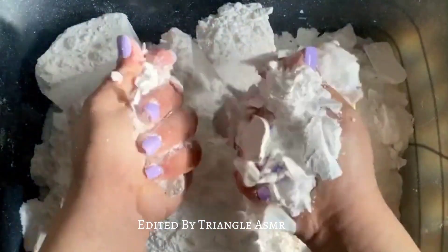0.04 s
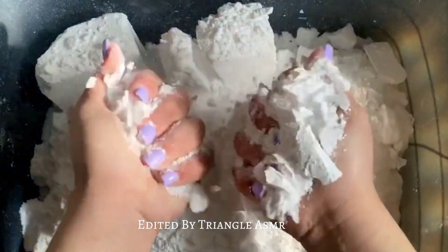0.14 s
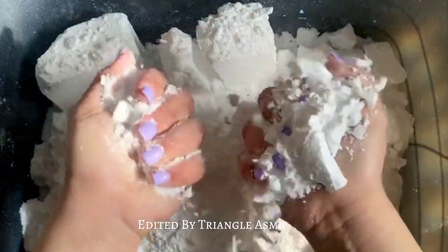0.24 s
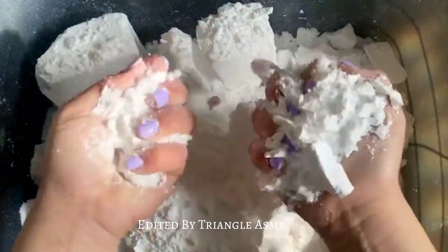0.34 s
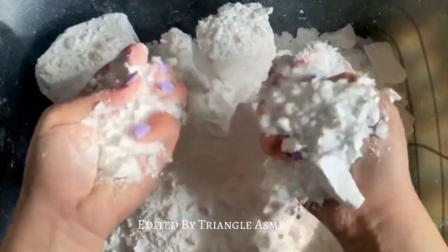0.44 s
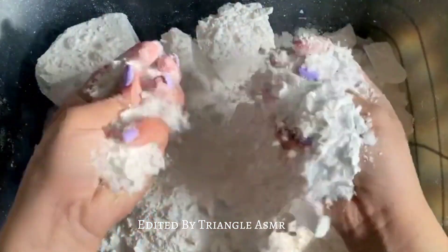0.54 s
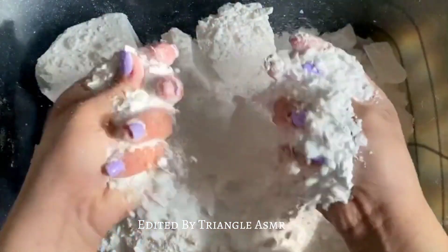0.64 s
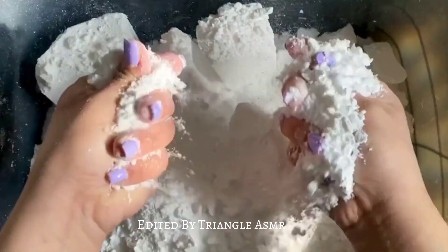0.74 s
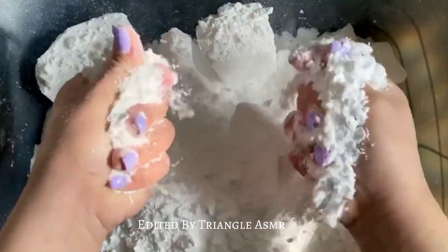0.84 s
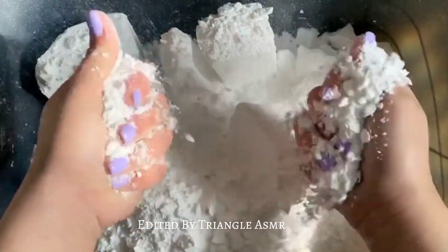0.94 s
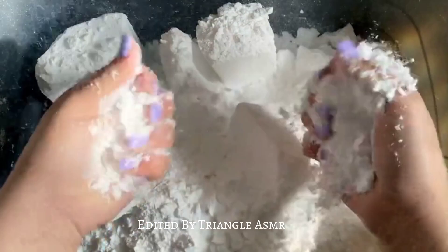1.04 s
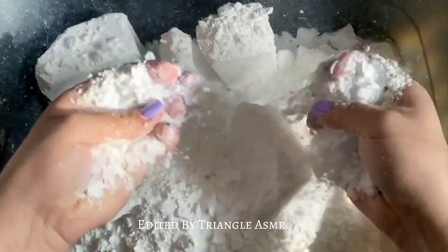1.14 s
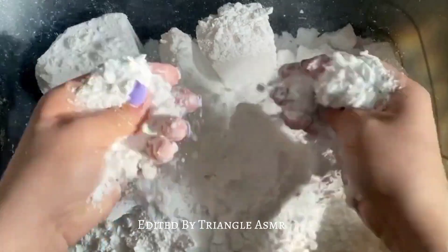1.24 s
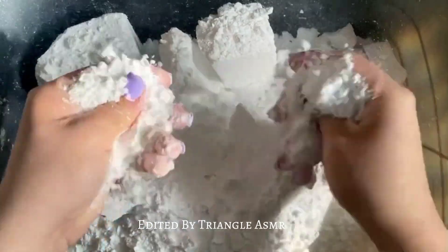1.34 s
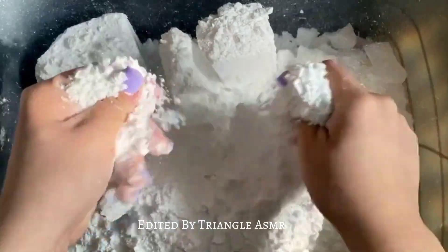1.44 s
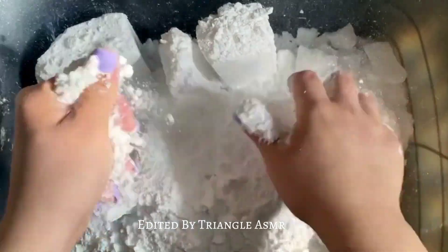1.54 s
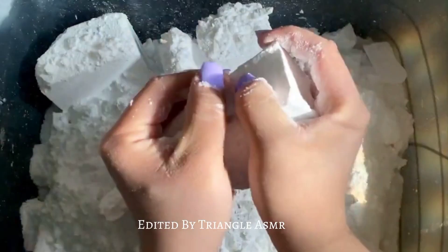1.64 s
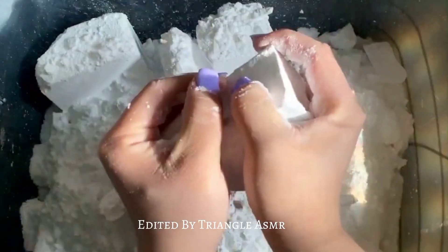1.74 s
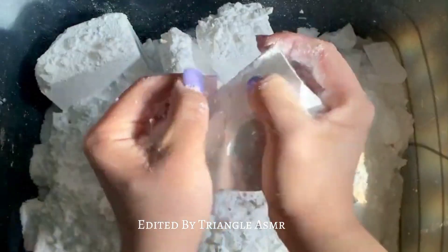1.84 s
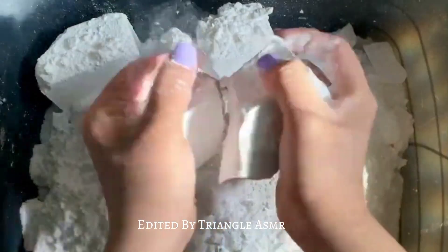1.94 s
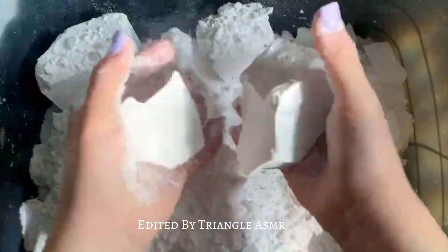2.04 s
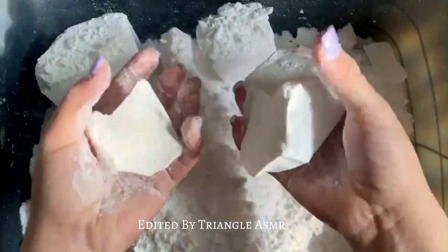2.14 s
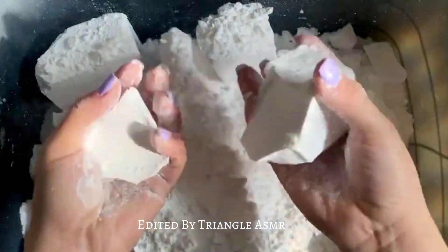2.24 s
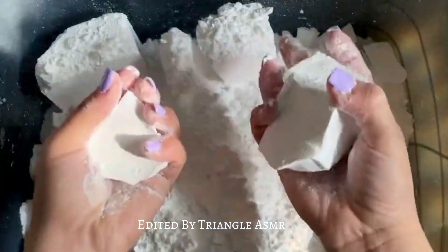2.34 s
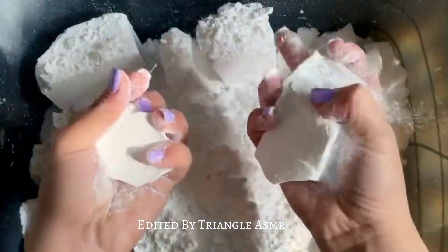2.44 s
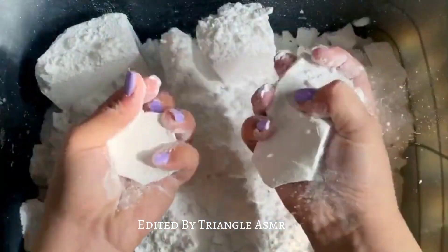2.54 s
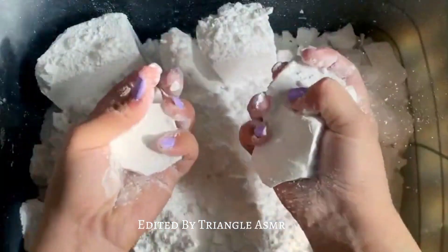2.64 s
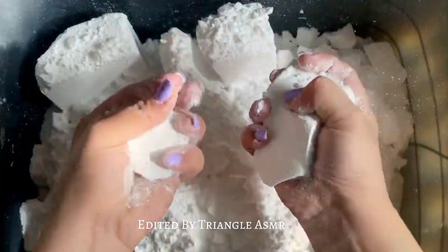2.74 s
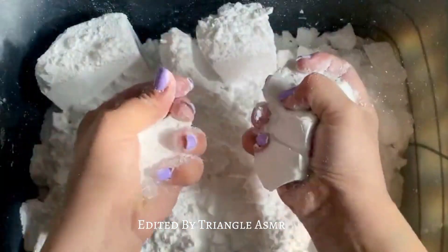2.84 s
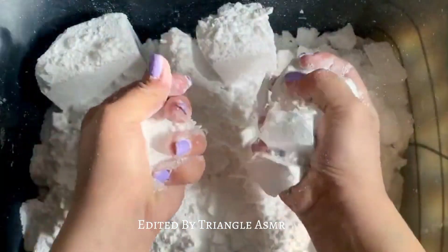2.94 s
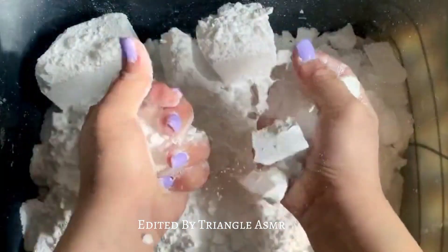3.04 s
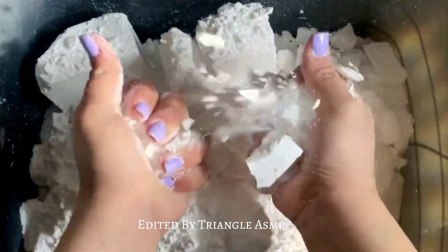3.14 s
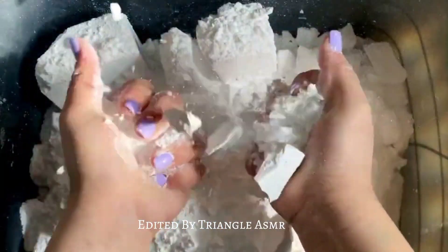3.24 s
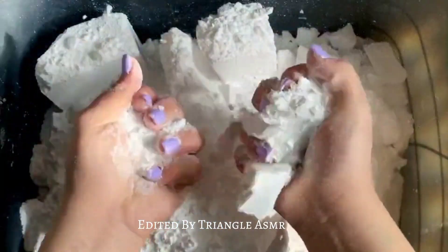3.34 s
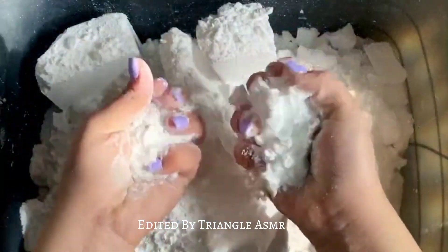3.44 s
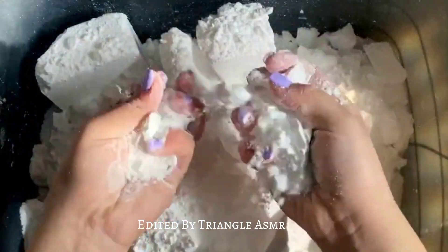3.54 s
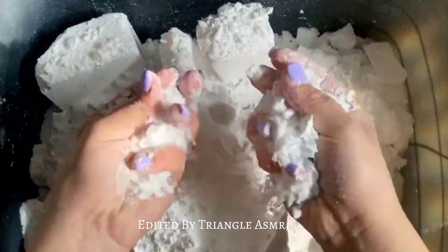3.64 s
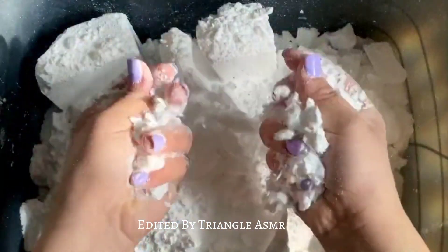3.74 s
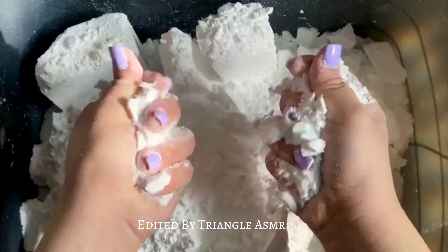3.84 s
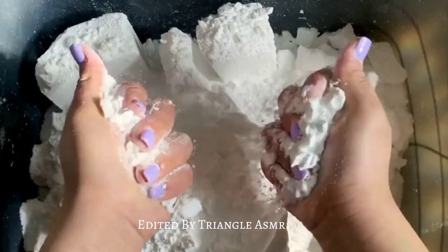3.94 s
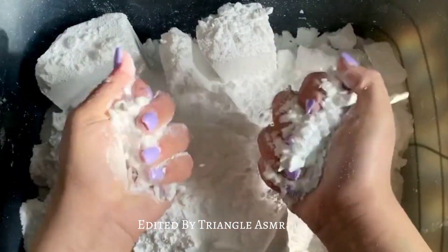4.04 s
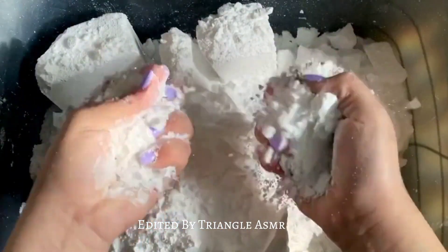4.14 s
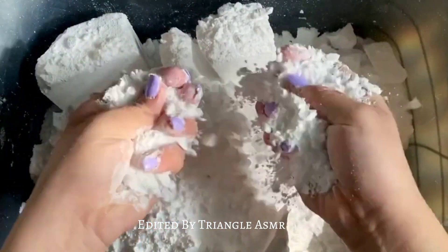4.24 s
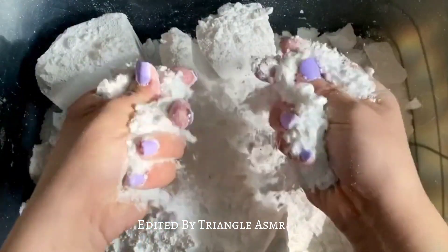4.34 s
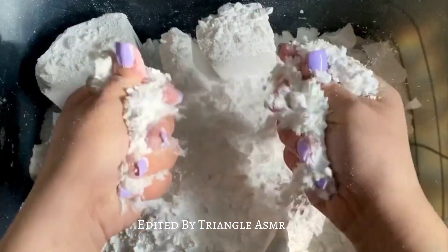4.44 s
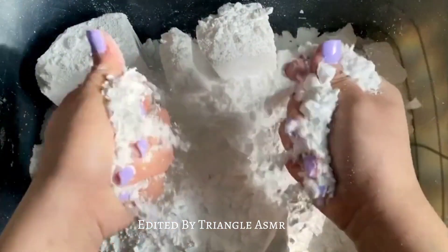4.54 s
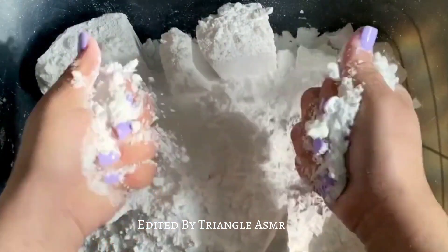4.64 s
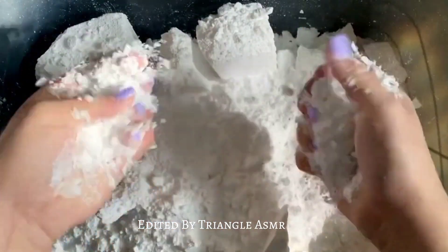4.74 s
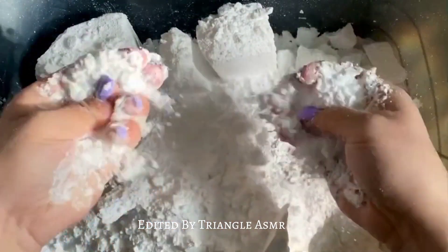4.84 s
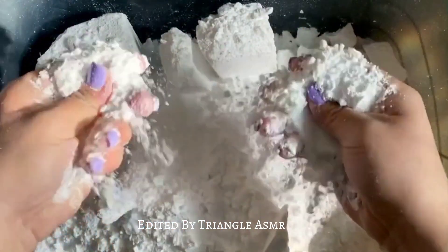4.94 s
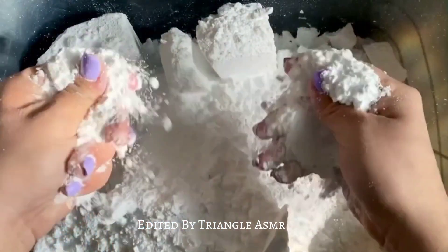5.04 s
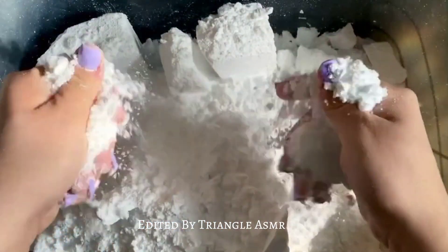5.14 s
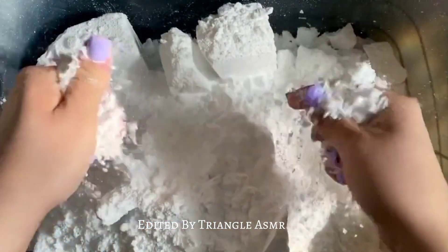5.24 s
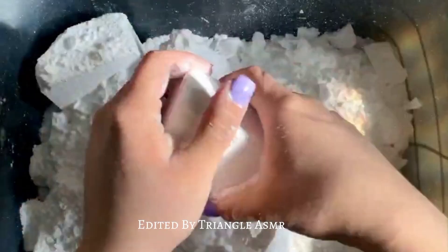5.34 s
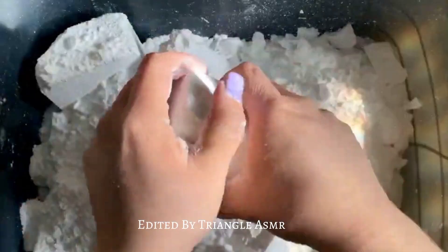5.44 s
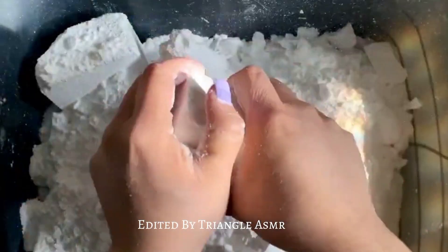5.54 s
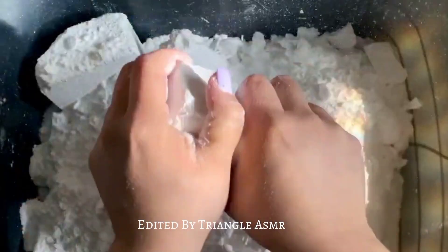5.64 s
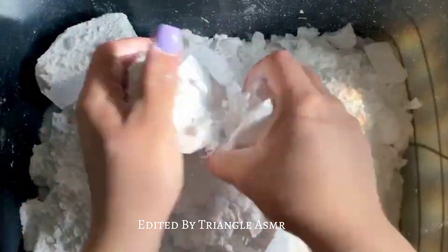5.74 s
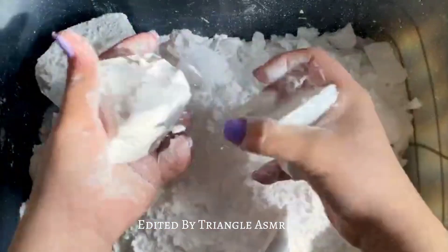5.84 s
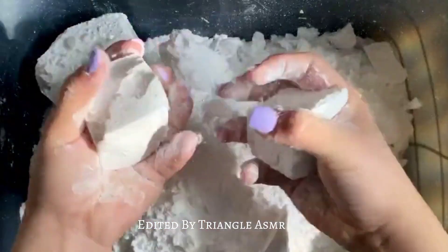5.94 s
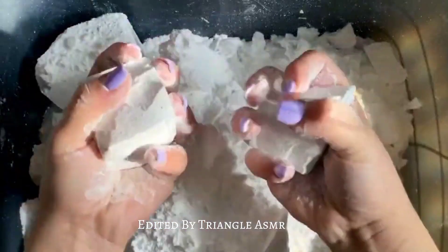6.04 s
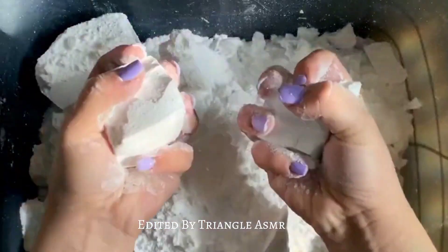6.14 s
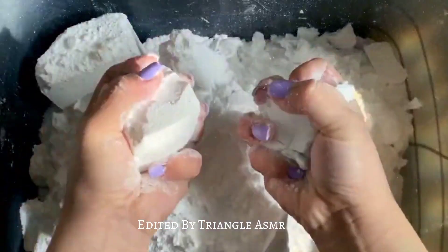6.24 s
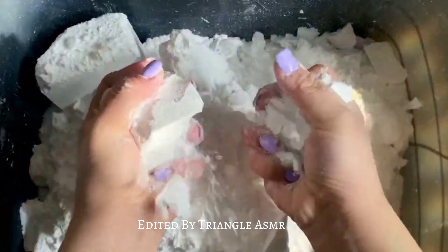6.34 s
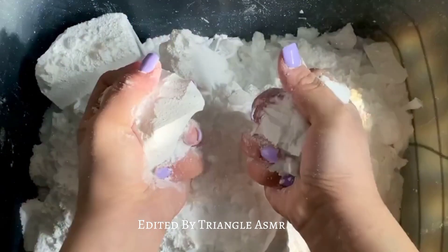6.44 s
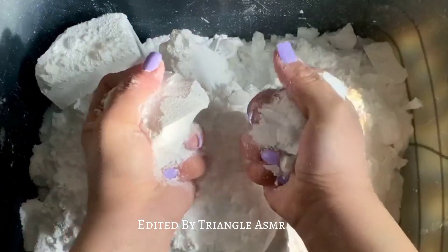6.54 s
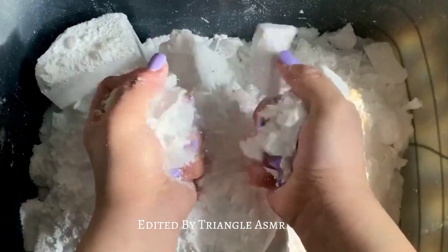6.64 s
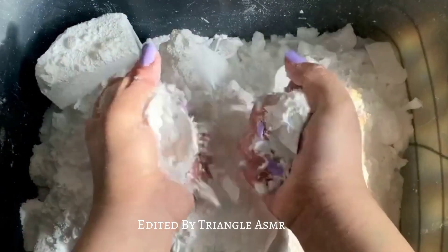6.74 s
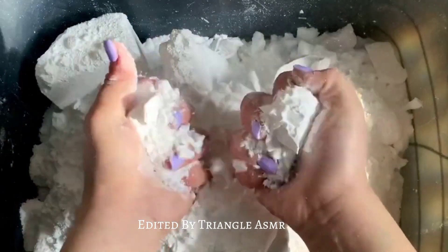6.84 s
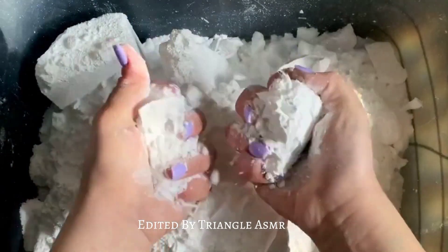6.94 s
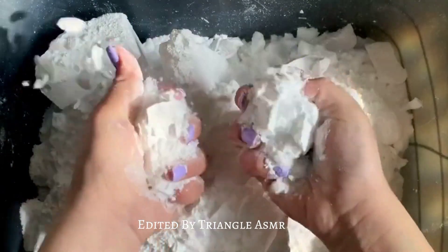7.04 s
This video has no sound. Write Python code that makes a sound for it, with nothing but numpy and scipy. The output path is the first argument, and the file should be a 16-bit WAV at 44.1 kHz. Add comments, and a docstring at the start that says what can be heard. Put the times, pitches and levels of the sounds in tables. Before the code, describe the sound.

Close, dry chalk crushing: soft crumbling and crumb thuds, then loud brittle snaps, crackling fractures and powdery crunches in a small room with low hum.

```python
"""Faint dry cracks and the soft thuds of crumbs come first, over a low hum; then sharp fractures ring in a room.
Two hands close to the microphone snap and crush chalk blocks over a bin of powder. Fractures are band-limited
noise bursts, splitting blocks and crumbs are decaying modes, crumbling is random ringing grains plus hiss, and
rubbing is noise in narrow resonances. A far machine is sines on rumble. The signal now and then drops in short
square pops, and at two edits the level dips briefly."""
import sys
import numpy as np
from scipy import signal
from scipy.io import wavfile

SR = 44100
rng = np.random.default_rng(int(sys.argv[2]) if len(sys.argv) > 2 else 0)


def boost(x):
    """Linear amplitude factor 10**(x/20) for a level x in decibels (scalar or array-like)."""
    u = np.asarray(x, float) / 20
    return 10 ** u


def generate_wav(signal):
    """Clip the signal to [-1, 1] and save it as 16-bit WAV at the path in sys.argv[1]."""
    frames = np.transpose(np.atleast_2d(signal))
    scaled = np.clip(frames, -1, 1) * 32767
    pcm = np.round(scaled).astype(np.int16)
    wavfile.write(sys.argv[1], SR, pcm)


N = 313110

# machine tones: multiple of HUM_HZ, level/dB rms
HUM_TONES = [(1, -48.5), (2, -65), (4, -63.5)]
HUM_HZ = 39.04
# machine rumble: f/Hz, level/dB rms in band
RUMBLE_BANDS = [(14, -46.5), (22, -60.5), (32, -55.5), (50, -64), (80, -64), (130, -64), (210, -64),
                (330, -77), (520, -73)]
# square drops of the signal: t/s, depth/dB
POPS = [(2.446, -20), (2.4848, -28), (2.4997, -25), (2.506, -26.5), (2.512, -10), (2.5185, -14.5),
        (2.5244, -16.5), (2.5921, -20), (2.6013, -19.5), (2.6151, -29), (2.6222, -23), (3.7162, -20.5),
        (3.7306, -21)]
POP_S = 0.000764
HELD_POP_S, HELD_POP_DB = 2.4688, -34  # one longer drop: start, depth
# edits where the level dips: t/s, fade half-width/s
EDIT_DIPS = [(1.588, 0.007), (5.336, 0.0052)]
# cupped hands and microphone: f/Hz, width/Hz, lift/dB
MIC_PEAKS = [(1056, 380, -2.5), (1520, 480, 2), (4280, 1860, -1.5), (14200, 890, 6)]
TREBLE_STOP_HZ = 15660  # from here up the treble cut takes off 40 dB
# room tail: f/Hz, t60/s, level/dB
ROOM_BANDS = [(305, 0.15, -3.5), (560, 0.42, -4), (1065, 0.6, -6.5), (2230, 0.38, -7.5), (4160, 0.33, -6.5)]
# rubbing strokes, and last a short noisy puff: start/s, end/s, level/dB
RUB_STROKES = [(1.811, 2.036, -62), (2.061, 2.26, -63.5), (5.653, 5.83, -61), (5.878, 5.908, -54)]
# whistles of the rubbing: f/Hz, width/Hz, level/dB against the stroke
RUB_WHISTLES = [(3020, 200, -23), (5860, 1300, -6), (7600, 280, -7.5), (9100, 2700, -1.5),
                (12200, 1000, -4), (13300, 990, -2), (15200, 600, -2)]
# spans with few small crumbs: start/s, end/s
SPARSE_SPANS = [(1.7, 2.32), (5.35, 5.94)]
# kneading of the hands: t/s, effort as level/dB of loose chalk, fineness/dB (powder up, crumbs down)
KNEADING = [(0.0, -41.5, 6), (0.15, -52, 1.5), (0.3, -50.5, 1.5), (0.5, -47.5, 3), (0.7, -50.5, 3),
            (0.96, -48.5, 4), (1.18, -53, 1), (1.575, -52, 1), (1.6, -62, 0.5), (1.84, -57.5, -3),
            (2.05, -59.5, 1), (2.22, -49, 13.5), (2.29, -58, 7), (2.5, -50.5, 4), (2.561, -59, 6),
            (2.64, -50, 7), (2.9, -51.5, 9), (3.2, -51.5, 0.5), (3.7, -45.5, 3), (3.8, -47, 4),
            (3.93, -52, -1), (4.5, -51.5, 3.5), (4.69, -54.5, -0.5), (4.9, -52.5, 0.5), (5.32, -52.5, 4),
            (5.35, -51.5, 9), (5.49, -55.5, 6), (5.75, -50, 5.5), (5.97, -56, 6), (6.12, -55.5, 7),
            (6.25, -49, 6), (6.42, -55.5, 4), (6.55, -41, -1.5), (6.75, -54, -3), (6.94, -55.5, 4.5),
            (7.02, -47.5, -2.5), (7.1, -52.5, 12)]
# crumbs, grit, powder: low f/Hz, high f/Hz, grains per s, size spread/dB, cycles to t60, hiss level/dB,
# layer level/dB, share of fineness, spill level/dB
GRAIN_LAYERS = [(245, 1210, 260, 5.5, 1.2, 5, -7.5, -0.86, -9),
                (1510, 6100, 500, 3, 3.3, 2.5, -7, -0.81, -10.5),
                (6900, 19800, 1600, 3.5, 4.2, 0.5, -6.5, 0.4, 1.5)]
# powder that runs out after a fracture: level against its edge, time to die by 60 dB
SPILL_DB, SPILL_T60_S = -18, 0.25
# crumbs landing in the bin: t/s, strike level/dB, f/Hz of the lowest mode
CRUMB_THUDS = [(0.05, -32.5, 676), (0.087, -31.5, 373), (0.13, -28.5, 380), (0.546, -38, 560),
               (0.599, -37.5, 392), (0.651, -38, 490), (2.48, -37, 340), (3.437, -39.5, 800),
               (4.483, -43, 457), (5.976, -43, 407), (6.623, -35.5, 530)]
THUD_CYCLES = 8.7  # cycles in which a thud mode dies by 60 dB
# hard chips that ring briefly: t/s, strike level/dB, f/Hz, t60/s
RINGING_CHIPS = [(5.603, -48, 4160, .04), (5.6435, -46, 4220, 0.02), (5.655, -42.5, 9650, 0.024),
                 (6.72, -39.5, 3280, 0.039), (6.986, -39, 3220, 0.017), (0.47, -40, 7860, 0.024),
                 (0.599, -39, 6340, 0.015)]
# solid pieces that ring as they split: t/s, strike level/dB, pitch as a multiple of BLOCK_MODES
BLOCK_SPLITS = [(1.3241, -34, 1.55), (1.3525, -35.5, 1.15), (1.6866, -9.5, .95), (2.8851, -29, 2.3),
                (2.9398, -18.5, 2.6), (3.0066, -35, 2.5), (4.4831, -32.5, 1.1), (4.668, -35, 2.1),
                (5.4992, -14, .86), (5.5121, -13, 3.3), (6.423, -44, 2.6), (6.4705, -8.5, 2.0),
                (6.5754, -23, 2.3), (7.054, -34, 3.2)]
# modes of a block at pitch 1: f/Hz, level/dB, t60/s
BLOCK_MODES = [(810, 1.5, 0.0073), (1870, -21.5, 0.029), (2500, -17.5, 0.0065), (502, -9.5, 0.0069)]
# fractures: t/s, knock level/dB, tilt/dB per octave (small pieces tilt up), bright edge level/dB against the knock
FRACTURES = [(0.0056, -47, -4, -7), (0.0409, -51, 10, -3), (0.0619, -38.5, -4.5, -17),
             (0.1137, -41.5, -0.5, 0), (0.218, -52.5, 7, 13), (0.2977, -47, -0.5, -15),
             (0.3206, -54, -2, 10), (0.4708, -51, -5, 13), (0.4794, -47, -6, -4), (0.5164, -49, -1, 13),
             (0.6794, -46, -1.5, -2), (0.7355, -51, 9, 11), (0.9342, -52.5, 7, 11),
             (0.9862, -44.5, 0.5, -15), (1.2063, -55, 11.5, 3), (1.2411, -53.5, 8, -5),
             (1.6862, -18.5, -1, -3.5), (2.232, -45, 3.5, 3.5), (2.3105, -49, -1, 8),
             (2.328, -49.5, 12, 21), (2.3387, -33, 6.5, 8.5), (2.641, -40, 0, 9.5), (2.6543, -48, 11.5, 9),
             (2.6703, -35, -3, 2.5), (2.699, -45, 10.5, 18.5), (2.708, -49, 5, 6), (2.726, -38, 2, 6),
             (2.757, -60, 6, 18), (2.7713, -54.5, 5, 22), (2.8175, -43, -6, 9), (2.8266, -42, 11.5, 1),
             (2.8327, -30, -1, 7), (2.8485, -53, 11, -1), (2.8833, -33, 2, -14), (2.895, -37, 0.5, 4),
             (2.915, -43, 5, -1), (2.921, -48, 8, 11), (2.9391, -35.5, 1.5, 0), (2.989, -58, 10, 9),
             (3.0066, -24, 1.5, -3), (3.02, -22, 1, 1), (3.0242, -36, 5, 6), (3.036, -50, 8, 7),
             (3.066, -55, 13, 14), (3.1166, -32, 3.5, -16), (3.1276, -43, 8, 11), (3.2077, -44, 7.5, 9),
             (3.26, -42, 3.5, -23), (3.2963, -52, 6, -1), (3.3178, -41, 5, -16), (3.3716, -43, 2, -18),
             (3.549, -40.5, 3.5, 1), (3.6666, -48, 7.5, 0), (3.6863, -53.5, 12, 12), (3.7892, -66, 6, 24),
             (3.8293, -40, 7.5, -12), (3.8378, -39, 4.5, 2), (3.9314, -54, 8, 11), (4.002, -38.5, 2, -16),
             (4.0778, -48, 5.5, -8), (4.1002, -60, 4.5, 23), (4.2045, -49.5, -3, 9), (4.3434, -48, 1, -1),
             (4.6063, -63, -4, 19), (4.668, -56, -5, -23), (4.7392, -45, -1, -12), (5.491, -65, 14, 1),
             (5.5, -24.5, 4, 7), (5.5045, -40.5, 6.5, 0), (5.5114, -30.5, 1.5, 7),
             (5.9443, -52.5, 10.5, 17.5), (5.9841, -54.5, 14.5, 12.5), (6.066, -51, 6.5, -3),
             (6.1464, -47.5, -4, 8), (6.181, -55, 12, 16), (6.2228, -36.5, 4.5, 8), (6.2343, -57, 7, 17),
             (6.283, -42, 5, 0), (6.318, -48.5, 5.5, -1), (6.422, -30.5, 3, -7), (6.4708, -27.5, 1, 5.5),
             (6.49, -28.5, 2, 2), (6.502, -34, -1, -8), (6.5544, -40, 2, 2), (6.5753, -28, -0.5, 5.5),
             (6.6133, -58, 1, 9), (6.6909, -50, 4.5, 13), (6.7211, -47, 2, 7), (6.8797, -37, 2, 0.5),
             (6.9264, -45.5, 4.5, 6), (6.986, -42, 1, 1.5), (7.0513, -42, 1, -28), (7.0556, -41, -1, -31)]
# fracture bands: low f/Hz, high f/Hz, splinter t60/s, splinter level/dB against the push, band level/dB
FRACTURE_BANDS = [(280, 1270, 0.0018, -14, -4), (1050, 3510, 0.0012, -11.5, -2),
                  (3000, 8900, 0.0021, -7, -4.1), (8000, 20600, 0.0034, -12, -2.6)]
KNOCK_HZ, BOW_DB_PER_OCT2 = 1860, -0.7052  # pivot of tilt and bow; bow of the fracture spectrum


def rms_one(x):
    """Scale the last axis to rms 1."""
    return x / np.sqrt(np.mean(x ** 2, axis=-1, keepdims=True) + 1e-20)


def band(x, low_hz, high_hz):
    """Butterworth band-pass."""
    edges_hz = [low_hz, min(high_hz, .45 * SR)]
    return signal.sosfilt(signal.butter(2, edges_hz, "band", fs=SR, output="sos"), x)


def drift(rate_hz):
    """Slow random wander of spread 1: low-passed noise drawn every 40 samples."""
    r = np.exp(-80 * np.pi * rate_hz / SR)
    noise = rng.standard_normal(N // 40 + 2002)
    slow = signal.lfilter([1], [1, -2 * r, r * r], noise)[2000:]  # skip the filter's start
    return np.interp(np.arange(N) / 40, np.arange(len(slow)), rms_one(slow))


def ring(clicks, hz, t60):
    """A damped resonator: a unit click sets a sine of height 1 ringing."""
    r, w = boost(-60 / (t60 * SR)), 2 * np.pi * hz / SR
    return signal.lfilter([0, np.sin(w)], [1, -2 * r * np.cos(w), r * r], clicks + 1e-18)


def machine(waver_db=0.66, wander=0.0038):
    """A motor tone and a few multiples, slightly unsteady in pitch and level, on low rumble."""
    phase = 2 * np.pi * np.cumsum(HUM_HZ * (1 + wander * drift(1.9))) / SR
    tone = rumble = 0
    for multiple, db in HUM_TONES:
        level = np.sqrt(2) * boost(db + waver_db * drift(1.9))
        tone = tone + level * np.sin(multiple * phase)
    for hz, db in RUMBLE_BANDS:
        noise = band(rng.standard_normal(N), hz / 1.447, hz * 1.17)
        rumble = rumble + boost(db) * rms_one(noise)
    return tone + rumble


def pops():
    """The signal steps down and back with sharp edges."""
    t = np.arange(N) / SR
    drops = [(s, db, POP_S) for s, db in POPS] + [(HELD_POP_S, HELD_POP_DB, 8 * POP_S)]
    return -sum(boost(db) * ((t >= s) & (t < s + length_s)) for s, db, length_s in drops)


def microphone(x):
    """Cupped hands and microphone colour the sound with resonant lifts and dips."""
    for hz, width_hz, db in MIC_PEAKS:
        peak = signal.lfilter(*signal.iirpeak(hz, hz / width_hz, fs=SR), x)
        x = x + (boost(db) - 1) * peak
    return x


def edit_dips(x):
    """At each edit the level fades down to a tenth and back up."""
    t = np.arange(N) / SR
    for s, half_s in EDIT_DIPS:
        x = x * np.clip(abs(t - s) / half_s, .1, 1)
    return x


def room(x, first_s=0.0036, build_s=0.0043):
    """Diffuse tail: noise that builds up after the first wall and dies band by band."""
    t, tail = np.arange(SR // 2) / SR, 0
    for hz, t60, db in ROOM_BANDS:
        noise = rms_one(band(rng.standard_normal(len(t)), hz / np.sqrt(2), hz * np.sqrt(2)))
        dying = noise * boost(-60 * t / t60)
        width = np.sqrt(hz / np.sqrt(2) / (SR / 2))  # keeps dB a share of the direct energy
        tail = tail + boost(db) * width * dying / np.sqrt(np.sum(dying ** 2))
    onset = (t > first_s) * (1 - np.exp(-t / build_s))
    return signal.fftconvolve(x, tail * onset)[:N]


def rub(flicker_db=4.0, fade_s=0.013):
    """Friction noise in narrow resonances that each come and go."""
    t = np.arange(N) / SR
    stroke = whistling = 0
    for start, end, db in RUB_STROKES:
        stroke = stroke + boost(db) * np.clip(np.minimum(t - start, end - t) / fade_s, 0, 1)
    white = rng.standard_normal(N)
    for hz, width_hz, db in RUB_WHISTLES:
        whistle = rms_one(band(white, hz - width_hz / 2, hz + width_hz / 2))
        whistling = whistling + boost(db + flicker_db * drift(27.0)) * whistle
    return stroke * whistling


def spill():
    """Power of the powder that each fracture frees, running out exponentially."""
    freed = np.zeros(N)
    for s, knock_db, _, edge_db in FRACTURES:
        freed[round(s * SR)] += boost(knock_db + edge_db + SPILL_DB) ** 2
    decay = boost(-120 / (SPILL_T60_S * SR))  # power, so twice the dB
    return signal.lfilter([1], [1, -decay], freed + 1e-18)


def crumble(clump_db=2.5, clump_rate_hz=19.0, own_db=3.5, sparse_db=-7):
    """Tiny breaks come in clumps and ring a few cycles; powder sliding over skin adds a smooth hiss."""
    s, effort_db, fine_db = np.transpose(KNEADING)
    t, out = np.arange(N) / SR, 0
    clump, spilt = drift(clump_rate_hz), spill()
    sparse = sum((t > start) & (t < end) for start, end in SPARSE_SPANS) > 0
    shed = np.where(sparse, boost(sparse_db), 1)  # few crumbs fall here
    for low_hz, high_hz, per_s, spread_db, cycles, hiss_db, layer_db, fine_share, spill_db in GRAIN_LAYERS:
        sizes = boost(spread_db * np.minimum(rng.exponential(1, N), 4.2)) * rng.choice([-1, 1], N)
        born = rng.random(N) < per_s * boost(clump_db * clump) / SR
        # each grain is dealt one of 14 pitches
        pitches_hz, dealt = np.geomspace(low_hz, high_hz, num=14), rng.integers(0, 14, N)
        grains = sum(ring(sizes * born * (dealt == k), hz, cycles / hz) for k, hz in enumerate(pitches_hz))
        crumbs = shed * rms_one(band(grains, low_hz, high_hz))
        hiss = band(rng.standard_normal(N), low_hz, high_hz)
        hiss = hiss * boost(.5 * clump_db * clump + own_db * drift(16.0))
        layer = rms_one(crumbs + boost(hiss_db) * rms_one(hiss))
        kneaded = boost(layer_db + np.interp(t, s, effort_db + fine_share * fine_db))
        out = out + np.sqrt(kneaded ** 2 + boost(spill_db) ** 2 * spilt) * layer
    return out


def thuds(upper=2.06, upper_db=-3, top=2.96, top_db=-6, delay_s=0.00198):
    """A crumb strikes and rings three modes, shortly after its listed time; the higher die sooner."""
    out = np.zeros(N)
    for s, db, hz in CRUMB_THUDS:
        at = round((s + delay_s) * SR)
        click = np.zeros(4096)
        click[0] = boost(db)
        modes = [(hz, 0), (upper * hz, upper_db), (top * hz, top_db)]
        for k, (mode_hz, mode_db) in enumerate(modes):
            sign = (-1) ** k
            out[at:at + 4096] += boost(mode_db) * sign * ring(click, mode_hz, THUD_CYCLES / mode_hz)
    return out


def chips():
    """Each hard chip rings as one clean decaying mode."""
    out = np.zeros(N)
    for s, db, hz, t60 in RINGING_CHIPS:
        at = round(s * SR)
        click = np.zeros(4096)
        click[0] = boost(db)
        out[at:at + 4096] += ring(click, hz, t60)
    return out


def blocks(small_hz=230):
    """A split strikes every mode of the piece at once, small pieces higher and shorter; none gives bass."""
    out = np.zeros(N)
    for s, db, pitch in BLOCK_SPLITS:
        at = round(s * SR)
        click = np.zeros(1024)
        click[0] = boost(db)
        for hz, mode_db, t60 in BLOCK_MODES:
            out[at:at + 1024] += boost(mode_db) * ring(click, pitch * hz, t60 / pitch)
    return signal.sosfilt(signal.butter(2, small_hz, "high", fs=SR, output="sos"), out + 1e-18)


def cracks(gain_db=0.88, rubble_db=-22, rubble_s=0.12, run_s=0.0008, follow_db=-6.5, scatter_db=6.0,
           colour_db=2.0, colour_q=5.3):
    """Fractures run on as quick splintering breaks, each coloured by random peaks and dips; rubble dies away.

    The lows are one clean push, the highs shatter."""
    s, knock_db, tilt_db, edge_db = np.transpose(FRACTURES)
    bursts, size = 0, 2048
    t, first = np.arange(size) / SR, 66  # each burst is levelled over its first 66 samples
    noise = rng.standard_normal((len(s), len(FRACTURE_BANDS), size))
    gaps = run_s * SR * rng.uniform(.3, 1.7, (len(s), 3))
    lags = np.clip(np.cumsum(gaps, axis=1), 8, size - 1).astype(int)
    for k, (low_hz, high_hz, t60, splinter_db, band_db) in enumerate(FRACTURE_BANDS):
        octaves = np.log2(np.sqrt(low_hz * high_hz) / KNOCK_HZ)
        bowed_db = tilt_db * octaves + BOW_DB_PER_OCT2 * octaves ** 2
        top_band = k == len(FRACTURE_BANDS) - 1
        levels_db = knock_db + band_db + (edge_db if top_band else bowed_db)
        splinters = boost(splinter_db - 60 * t / t60)
        rubble = boost(splinter_db + rubble_db - 60 * t / rubble_s)
        push = (t == 0) * (-1.) ** k  # neighbouring bands join in phase at their shared edge
        burst = band(noise[:, k] * (splinters + rubble) + push, low_hz, high_hz)
        burst = burst / np.sqrt(np.mean(burst[:, :first] ** 2, axis=1, keepdims=True))
        run = np.tile(1. * (t == 0), (len(s), 1))
        if low_hz > KNOCK_HZ / 2:  # the later breaks are small: no bass
            later_db = follow_db * np.arange(1, 4) + scatter_db * rng.standard_normal(lags.shape)
            np.put_along_axis(run, lags, boost(np.minimum(later_db, -2)), axis=1)
            run = run / np.sqrt(np.sum(run ** 2, axis=1, keepdims=True))
        broken = signal.fftconvolve(burst, run, axes=1)[:, :size]
        bursts = bursts + boost(levels_db + gain_db)[:, None] * broken
    out = np.zeros(N + size)
    colour_octaves = rng.uniform(1, 3, (len(s), 4))
    for at, burst, octaves in zip(np.round(s * SR).astype(int), bursts, colour_octaves):
        # two peaks and two dips at random pitches
        for hz, sign in zip(KNOCK_HZ * 2 ** octaves, (1, -1, 1, -1)):
            peak = signal.lfilter(*signal.iirpeak(hz, colour_q, fs=SR), burst)
            burst = burst + (boost(sign * colour_db) - 1) * peak
        out[at:at + size] += burst
    return out[:N]


def scene(block_send_db=-2.5, crack_send_db=1.24):
    """Hands, bin and room over the hum; cracks and thuds feed the room more strongly than the ringing blocks."""
    sharp, rung = cracks() + thuds(), blocks()
    echo = room(boost(crack_send_db) * sharp + boost(block_send_db) * rung)
    close = sharp + rung + chips() + crumble() + rub()
    return (close + echo + machine())[None]


def roll_off(x):
    """The treble ends steeply here."""
    return signal.sosfilt(signal.butter(12, 16640, fs=SR, output="sos"), x)


def record(dry):
    """Microphone colour, pops, edit dips, then a steep treble cut."""
    x = edit_dips(microphone(dry) + pops())
    treble_cut = signal.cheby2(16, 40, TREBLE_STOP_HZ, fs=SR, output="sos")
    mix = signal.sosfilt(treble_cut, x)
    return roll_off(mix)


dry = scene()
out = record(dry)
generate_wav(out)
```